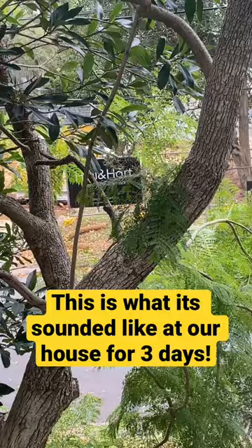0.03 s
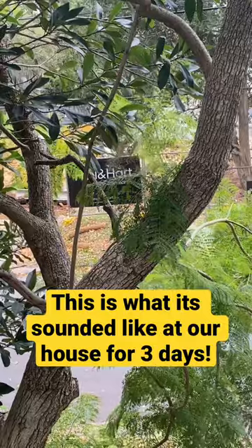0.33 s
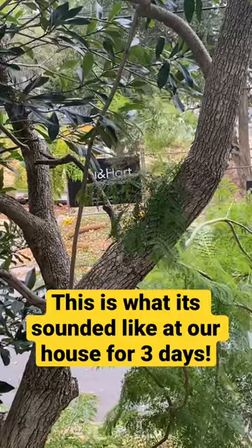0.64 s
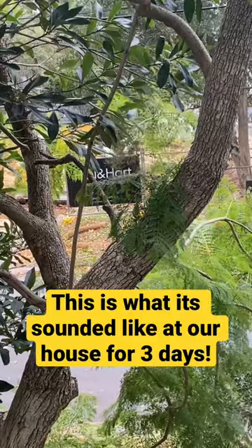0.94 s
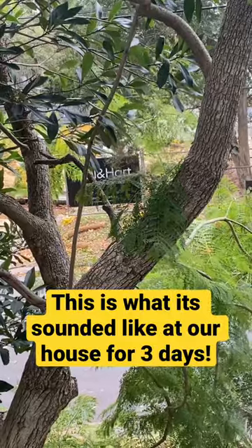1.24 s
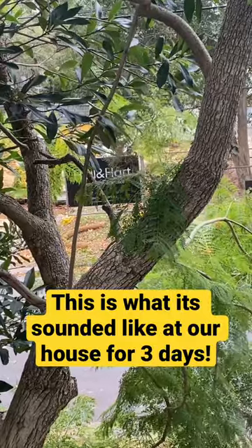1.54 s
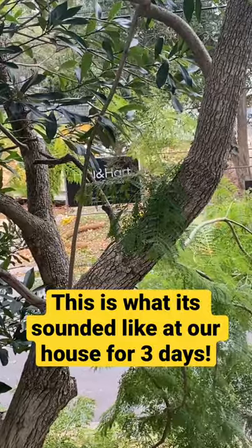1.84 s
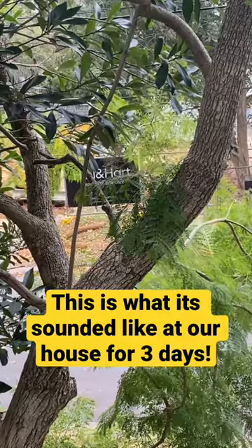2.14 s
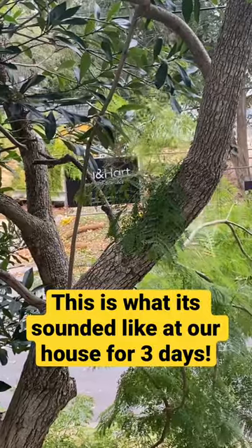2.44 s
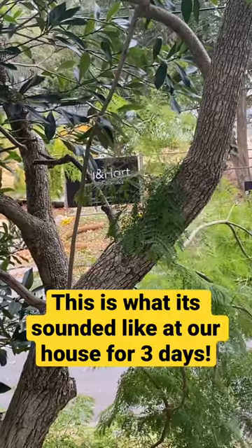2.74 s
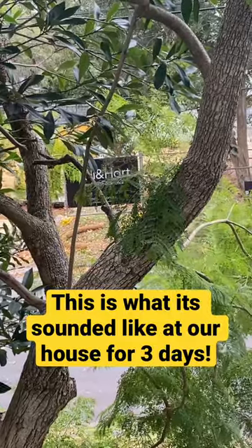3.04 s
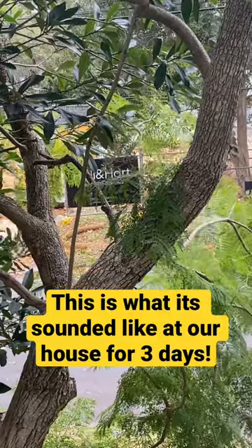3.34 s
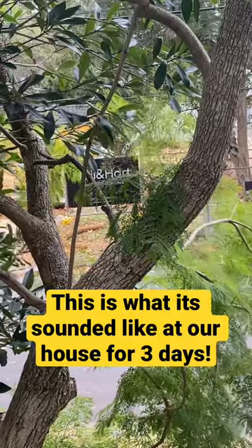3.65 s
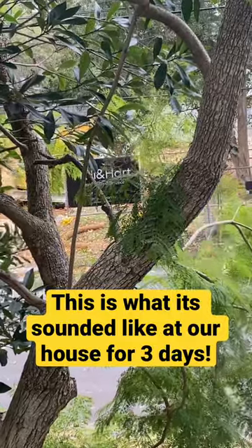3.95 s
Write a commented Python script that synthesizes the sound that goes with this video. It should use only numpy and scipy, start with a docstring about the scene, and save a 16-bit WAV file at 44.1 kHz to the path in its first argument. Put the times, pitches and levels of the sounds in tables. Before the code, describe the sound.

A distant jackhammer pounds rapidly on stone over a low engine drone.

```python
"""A jackhammer breaks ground across a street, about 8.5 blows a second with one short break.
Each blow is a steel crack with crumbling stone, a ringing chisel and a low thump;
house walls throw it back and the yards scatter it. A hollow ring joins as the bit bites deeper.
The engine that drives it drones beneath, slowly sagging under load; the rumble swells once."""
import sys
import numpy as np
from scipy import signal
from scipy.fft import rfft, irfft, next_fast_len
from scipy.io import wavfile
from scipy.ndimage import uniform_filter1d, map_coordinates

SR = 44100
rng = np.random.default_rng(int(sys.argv[2]) if len(sys.argv) > 2 else 0)


def master(y):
    """Save y as 16-bit WAV."""
    cut = np.clip(np.atleast_2d(y).T, -1, 1)
    pcm = np.round(cut * 32767)  # scale
    wavfile.write(sys.argv[1], SR, pcm.astype(np.int16))


N = 176400
TIME_S = np.arange(N) / SR
AGE_S = np.arange(SR // 2) / SR  # time since a blow


def amp(db):
    """Decibels to gain."""
    return 10 ** (np.asarray(db) / 20)


def unit(x):
    """Scale to rms 1."""
    return x / np.sqrt(np.mean(x ** 2) + 1e-20)


def along(points, hz):
    """Interpolate (freq_hz, value) rows on a log axis."""
    freq_hz, values = np.transpose(points)
    return np.interp(np.log(hz + 1), np.log(freq_hz + 1), values)


def curves(rows):
    """One value per sample for each column after the time."""
    time_s, *columns = np.transpose(rows)
    return [np.interp(TIME_S, time_s, column) for column in columns]


def wobble(rate_hz):
    """Smooth random curve."""
    knots = rng.standard_normal(int(N * rate_hz / SR) + 4)
    return map_coordinates(knots, [TIME_S * rate_hz])


def filtered(x, response):
    """Apply a complex frequency response."""
    n = x.shape[-1]
    size = next_fast_len(n + SR // 4)
    return irfft(rfft(x, size) * response(np.fft.rfftfreq(size, 1 / SR)), size)[..., :n]


def coloured(x, spectrum, size=4096):
    """Minimum-phase filter of unit energy."""
    cepstrum = irfft(np.log(amp(along(spectrum, np.fft.rfftfreq(size, 1 / SR)))))
    cepstrum[1:size // 2] *= 2
    cepstrum[size // 2 + 1:] = 0
    impulse = irfft(np.exp(rfft(cepstrum)))
    return signal.fftconvolve(x, impulse / np.linalg.norm(impulse))[:len(x)]


def delayed(x, delay_s):
    """Fractional delay."""
    return filtered(x, lambda hz: np.exp(-2j * np.pi * hz * delay_s))


def shape(rise_s, hold_s, t60_s):
    """Linear rise; exponential fall from hold_s on."""
    return np.clip(AGE_S / rise_s, 0, 1) * amp(-60 * np.maximum(AGE_S - hold_s, 0) / t60_s)


# hammer blows: start_s, level_db, crack_db, wall_db, treble_db
BLOWS = [(-0.046, 4.5, 4, 0, 4), (0.072, 2.5, 0, 0, -1.5), (0.19, 1.8, 2.5, -2, 1.5),
         (0.3052, 2, -0.5, 0.5, -0.5), (0.4224, 2.5, -0.5, -1, 0.5), (0.54, 1.5, 1.5, 1.5, 2.5),
         (0.6586, 0, 1.5, 0, 0), (0.779, 0.9, -1.9, -3.5, 1.5), (0.8983, 2, -5, -5, 4),
         (1.0168, 2.2, -6, -5, 1.5), (1.1363, 2.2, -5, -5, 2), (1.257, 2.5, -3, -3.5, 2),
         (1.3774, 2.6, -4.5, -6.5, 1.3), (1.4986, 2.8, -3.5, -5, -1), (1.6186, 2.8, -4.5, -3.5, 1),
         (1.7386, 2.5, -2.5, -4, 2), (1.8578, 2.5, -0.5, -1.5, 3), (2.0994, 1.2, -1.1, 0.5, 0.5),
         (2.2207, 2.1, 0, -1.5, -1.5), (2.337, 0.7, 0.4, 1, 0.5), (2.4522, 2, -0.7, 0.5, 1),
         (2.5716, 1.5, 0.5, 1, 3.5), (2.689, 1, -1, -2, 0), (2.8085, 0.2, 0.1, 0.5, 3),
         (2.925, 1, 0.5, -1.5, 2), (3.04, 0.5, 1, 0.3, 1), (3.1542, 0.5, 0.7, 2, 2.5),
         (3.2687, 0, 0, 0.3, 2), (3.38, 0.5, 0, 0.5, 2.5), (3.4907, 0.5, -0.5, 1.8, 0.5),
         (3.602, 1.2, -2, 0.5, -1.5), (3.7127, 1, 0, 1, -3), (3.8259, 0.5, 0.5, 1, -1),
         (3.94, -0.1, 3, 3.5, -3.5)]
BLOW_START_S, BLOW_LEVEL_DB, BLOW_CRACK_DB, BLOW_WALL_DB, BLOW_TREBLE_DB = np.transpose(BLOWS)


def struck(sounds, extra_db=0):
    """Lay one sound at each blow, at that blow's level."""
    track = np.zeros(N + 2 * SR)
    for start_s, gain, sound in zip(BLOW_START_S, amp(BLOW_LEVEL_DB + extra_db), sounds):
        track[SR + round(start_s * SR):][:len(AGE_S)] += gain * sound
    return track[SR:SR + N]


def treble_shelf(sounds):
    """Give each blow its own treble gain."""
    treble = filtered(sounds, lambda hz: np.clip((hz - 5000) / 3000, 0, 1))
    return sounds + (amp(BLOW_TREBLE_DB)[:, None] - 1) * treble


def bursts(envelope, shared, crossover_hz, drift_rad=1.6):
    """Noise per blow: a shared pattern that drifts as the bit sinks, plus fresh noise, most in treble."""
    pair = envelope * rng.standard_normal((2, len(AGE_S)))
    for _ in range(4):  # even out spectrum and level
        flat = irfft(np.exp(1j * np.angle(rfft(pair))), len(AGE_S))
        pair = envelope * flat / np.sqrt(np.abs(uniform_filter1d(flat ** 2, size=128)) + 1e-20)
    share = lambda hz: shared / (1 + (hz / crossover_hz) ** 4)
    pair = filtered(pair, lambda hz: np.sqrt(share(hz)))
    turn = np.linspace(0, drift_rad, len(BLOWS))[:, None]
    fresh = filtered(rng.standard_normal((len(BLOWS), len(AGE_S))), lambda hz: np.sqrt(1 - share(hz)))
    return np.cos(turn) * pair[0] + np.sin(turn) * pair[1] + envelope * fresh


def ringing(modes, rise_s, spread_rad, vary_db=0, extra_db=0):
    """Damped modes, set off a little differently by each blow."""
    pitch_hz, level_db, t60_s = np.transpose(modes)[:, :, None]
    chance = rng.standard_normal((len(BLOWS), 2, len(modes)))
    weights = amp(vary_db * chance[:, 0]) * np.exp(1j * spread_rad * chance[:, 1])
    waves = amp(level_db - 60 * AGE_S / t60_s) * np.exp(2j * np.pi * pitch_hz * AGE_S)
    return struck((weights @ waves).imag * (1 - np.exp(-AGE_S / rise_s)), extra_db)


# steel on stone: freq_hz, level_db
CRACK_SPECTRUM = [(400, -8.5), (700, -10), (1000, -14), (1300, -6), (1700, -3.5), (2400, 0.0), (3300, -9),
                  (4000, -4), (4800, -12.5), (5600, -1.5), (6500, -10.5), (7500, -11), (9000, -16),
                  (11000, -18), (12500, -28.5), (14000, -27), (15800, -39)]


def crack():
    """The chisel hits stone; nearby ground and the machine scatter a short spray."""
    hit = amp(-15) * shape(rise_s=0.000068, hold_s=0.0012, t60_s=0.051)
    spray = amp(-24) * shape(rise_s=0.0024, hold_s=0.0016, t60_s=0.1)
    cracks = bursts(np.hypot(hit, spray), shared=0.6, crossover_hz=7200) + grit()
    return coloured(struck(chipped(treble_shelf(cracks)), BLOW_CRACK_DB), CRACK_SPECTRUM)


def grit(ticks_per_s=350):
    """Crumbling stone ticks and dies away after each blow."""
    size = (len(BLOWS), len(AGE_S))
    ticks = unit(rng.standard_normal(size) * (rng.random(size) < ticks_per_s / SR))
    return amp(-28.5) * shape(rise_s=0.012, hold_s=0.004, t60_s=0.22) * ticks


def chipped(sounds, vary_db=2.03, step_hz=606):
    """The stone breaks with a different colour at each blow."""
    knots_hz = step_hz * np.arange(128)
    colours_db = vary_db * rng.standard_normal((len(sounds), len(knots_hz)))
    return filtered(sounds, lambda hz: amp([np.interp(hz, knots_hz, db) for db in colours_db]))


# wall echoes: freq_hz, level_db
WALL_SPECTRUM = [(400, -18.5), (700, -19), (1050, -21.5), (1400, -11), (1680, -3.5), (2050, -11.5),
                 (3300, -23.5), (4100, -10.5), (4800, -18.5), (5500, -16), (6500, -29.5), (11000, -34),
                 (15800, -71)]
# steel clank in the echoes: pitch_hz, level_db, t60_s
CLANK_MODES = [(1645, -3, 0.019), (1760, -8, 0.016), (4107, -14, .03)]


def wall_echoes(main_s=0.03, gap_s=0.0048, far_s=0.083):
    """House walls return a clanking slap: a flutter around the main echo, then a farther wall."""
    envelope = shape(rise_s=0.0015, hold_s=0.0026, t60_s=0.019)
    noise = bursts(envelope, shared=0.83, crossover_hz=6400, drift_rad=0.51)
    slap = amp(-16.5) * coloured(struck(noise, BLOW_WALL_DB), WALL_SPECTRUM)
    slap += ringing(CLANK_MODES, rise_s=0.0022, spread_rad=0.6, extra_db=BLOW_WALL_DB)
    taps_db = [-11.5, 0.5, -7.5, -15]
    flutter = sum(amp(db) * delayed(slap, main_s + k * gap_s) for k, db in enumerate(taps_db, -1))
    return flutter + amp(-15.5) * delayed(slap, far_s)


# scattered sound: freq_hz, level_db
YARD_SPECTRUM = [(150, -5), (250, -5.5), (430, -8), (550, -5), (680, -7.5), (870, -7.5), (1020, -10.5),
                 (1300, -14), (1700, -1.5), (2100, -8.5), (2700, -8.5), (3400, -11), (4200, -8),
                 (4800, -14), (5500, -6), (6500, -17), (7500, -17), (9000, -18.5), (11000, -24.5),
                 (13000, -34), (15800, -48)]


def yard_scatter(late_s=0.036):
    """The yards scatter each blow into near and far tails, with a puff after the main echo."""
    near = amp(-25.5) * shape(rise_s=0.01, hold_s=0.01, t60_s=0.44)
    far = amp(-32.5) * shape(rise_s=0.087, hold_s=0.04, t60_s=0.78)
    puff = amp(-23.5) * shape(rise_s=0.0013, hold_s=0.0018, t60_s=0.082)
    late = np.interp(AGE_S - late_s, AGE_S, puff)
    tails = bursts(np.sqrt(near ** 2 + far ** 2 + late ** 2), shared=0.66, crossover_hz=4900)
    return coloured(struck(treble_shelf(tails)), YARD_SPECTRUM)


# bright band of the impacts: time_s, gain_db
BITE_GAIN = [(0, -1.5), (.5, 0), (1.05, -0.4), (2.2, -1), (2.9, 1), (3.7, -3)]


def impacts(bounce_s=0.0038, bite_hz=5070, bite_octaves=0.4):
    """Cracks, echoes and scatter; a close reflection makes the blows hollow."""
    direct = crack()
    walls = wall_echoes()
    near = direct + yard_scatter()
    whole = near + amp(-14.5) * delayed(near, bounce_s) + walls
    bite = filtered(whole, lambda hz: np.exp(-0.5 * (np.log2((hz + 1) / bite_hz) / bite_octaves) ** 2))
    return whole + (amp(curves(BITE_GAIN)[0]) - 1) * bite


# chisel and housing, high note of the bit, hollow ring: pitch_hz, level_db, t60_s
STEEL_MODES = [(871.6, -0.5, 0.18), (1168.4, -2.5, 0.19), (1482, -2, 0.24), (1663, -12, 0.083),
               (1708, -6, 0.65), (1878, 0, 0.24), (1985, -8, 0.64), (2335, 5, 0.051), (2710, -9, 0.44),
               (4070, -11, 0.13), (4230, 0, 0.27), (5475, -12.5, .27), (6400, -5.5, 0.38)]
SING_MODES = [(4273, -1, 0.38), (4310, -12, 0.23)]
HOLLOW_MODES = [(536, -4.5, .36), (666, 2.5, 0.45), (769, -1, 0.38), (836, -2, .22), (1464, 3, 0.22),
                (3063, 10, 0.093)]
# level of each: time_s, level_db
STEEL_LEVEL = [(0, -27), (1.3, -28), (4, -27)]
SING_LEVEL = [(.7, -41), (.82, -28), (1.081, -29), (1.32, -33), (2.2, -36.5)]
HOLLOW_LEVEL = [(0, -47), (2.1, -53), (2.7, -31.5), (3.4, -32), (4, -32.5)]


def chisel():
    """The steel rings between blows, sings out briefly and gains a hollow ring as it sinks."""
    groups = [(STEEL_MODES, STEEL_LEVEL), (SING_MODES, SING_LEVEL), (HOLLOW_MODES, HOLLOW_LEVEL)]
    return sum(amp(curves(level)[0]) * ringing(modes, rise_s=0.0061, spread_rad=0.46, vary_db=2.5)
               for modes, level in groups)


# ground and frame: pitch_hz, level_db, t60_s
THUMP_MODES = [(69, -16, 0.16), (126, -4.5, 0.045), (164, -2, 0.065), (195.2, -4, 0.064), (234, -8, 0.071),
               (293.4, -7, 0.069)]
# strength of the push: time_s, gain_db
THUMP_GAIN = [(.4, 0.5), (.8, -3.5), (1.3, -0.5), (2.4, 0.5), (4, -1.5)]


def thump(lag_s=0.00526, echo_s=0.0302):
    """Each blow pushes ground and frame; the main wall returns the thump."""
    body = ringing(THUMP_MODES, rise_s=0.003, spread_rad=0.61)
    push = amp(-16 + curves(THUMP_GAIN)[0]) * delayed(body, lag_s)
    return push + amp(-3) * delayed(push, echo_s)


# exhaust note: time_s, pitch_hz, level_db
EXHAUST_NOTE = [(0, 100.9, -56.5), (.2, 102.2, -26.5), (.75, 100.5, -33), (1.05, 99.8, -29),
                (1.35, 99.2, -24), (1.75, 99.1, -24.5), (2.1, 98.23, -27), (2.4, 97.1, -30.5),
                (2.7, 95.8, -26), (3, 96.04, -21.5), (3.3, 96, -30), (3.55, 96.3, -28.5), (4, 94.9, -30)]
# its harmonics: multiple, level_db
EXHAUST_HARMONICS = [(1, -2), (2, -19), (3, -30)]
# engine rumble: freq_hz, level_db
RUMBLE_SPECTRUM = [(15, -39), (30, -31), (52, -10), (70, 2), (160, -4.5), (250, -13), (450, -14),
                   (1000, -23.5), (4000, -23.5), (9000, -47), (15000, -57)]
# its level: time_s, level_db
RUMBLE_LEVEL = [(0, -33), (.7, -34), (1.1, -33), (1.6, -33), (2.3, -34), (3, -31.5), (4, -43.5)]


def engine(hum_hz=57.7):
    """The exhaust note sags under load, over a steady lower hum and broad rumble."""
    pitch_hz, level_db = curves(EXHAUST_NOTE)
    phase = 2 * np.pi * np.cumsum(pitch_hz * (1 + 0.0048 * wobble(10.6))) / SR
    harmonics = sum(amp(db) * np.sin(k * phase) for k, db in EXHAUST_HARMONICS)
    exhaust = amp(level_db + 0.5 * wobble(8.8)) * harmonics
    hum = amp(-36 + 0.61 * wobble(3.8)) * np.sin(2 * np.pi * hum_hz * TIME_S + 0.28 * wobble(5.1))
    rumble = amp(curves(RUMBLE_LEVEL)[0]) * unit(coloured(rng.standard_normal(N), RUMBLE_SPECTRUM))
    return np.sqrt(2) * (exhaust + hum) + rumble


# low swell: freq_hz, level_db
SWELL_SPECTRUM = [(40, -28), (80, -5), (125, -2), (175, -4), (600, -63)]


def swell(peak_s=1.61, half_width_s=0.067):
    """The low rumble rises for a moment."""
    hump = np.exp(-((TIME_S - peak_s) / half_width_s) ** 2)
    return amp(-25) * hump * unit(coloured(rng.standard_normal(N), SWELL_SPECTRUM))


# sideways scatter: freq_hz, gain_db
SIDE_SPECTRUM = [(50, -35), (300, -19), (600, -11), (1000, -7), (1700, -14), (3000, -21.5), (5000, -16),
                 (15000, -7.5)]


def tree_scatter(site):
    """Trees scatter a short tail that differs between left and right."""
    leaves = rng.standard_normal(len(AGE_S)) * shape(rise_s=0.0013, hold_s=0.001, t60_s=0.15)
    tail = signal.fftconvolve(site, leaves / np.linalg.norm(leaves))[:N]
    return filtered(tail, lambda hz: amp(along(SIDE_SPECTRUM, hz)))


def scene():
    """The work site in stereo."""
    site = impacts() + chisel() + thump() + engine() + swell()
    side = tree_scatter(site)
    return np.array([site + side, site - side])


# microphone port levels: freq_hz, left_minus_right_db
PORT_BALANCE = [(100, -.3), (300, -1), (520, -1), (650, 4), (930, 7), (1050, 3.5), (1200, 9.5), (1450, 2.7),
                (1750, 3), (2100, .3), (3000, 0)]
# microphone port phases: freq_hz, left_lead_rad
PORT_PHASE = [(100, 0), (300, .1), (600, .5), (900, .4), (990, -.6), (1150, .2), (1350, -.7), (1900, 0),
              (2450, .6), (3200, .05), (3800, .15), (4400, .75), (5000, .15), (6000, 1.6), (7400, 3.14),
              (8500, 4.4), (9800, 6.2), (11500, 6.3), (12600, 8.3), (13500, 9.4), (15500, 10.4)]


def record(dry):
    """Two microphone ports differ in level and phase; the sound is band-limited and opens after 35 ms."""
    low_cut_hz, top_hz = 39.2, 15900
    split = np.array([[0.5], [-0.5]])
    ports = lambda hz: amp(split * along(PORT_BALANCE, hz)) * np.exp(1j * split * along(PORT_PHASE, hz))
    band = lambda hz: (hz < top_hz) * (1 - 1 / (1 + (hz / low_cut_hz) ** 6))
    mid = dry.mean(0)
    fade_in = np.clip((TIME_S - 0.035) / 0.0017, 0, 1)
    return filtered(filtered(mid, ports) + dry - mid, band) * fade_in


dry = scene()
out = record(dry)
master(out)
```